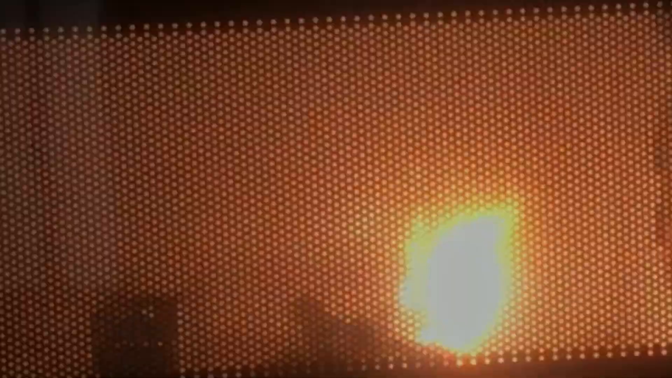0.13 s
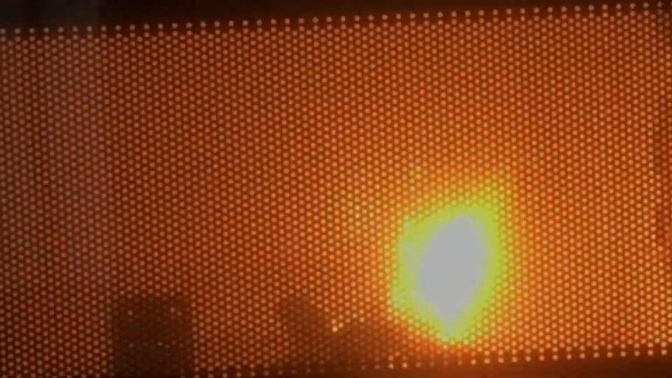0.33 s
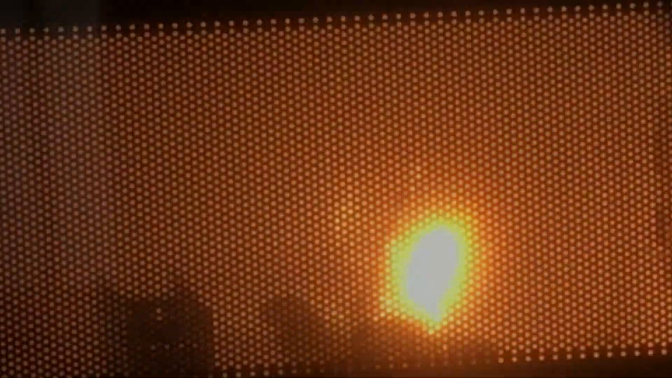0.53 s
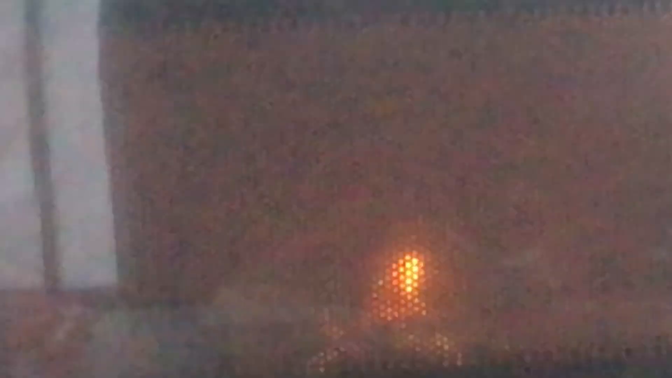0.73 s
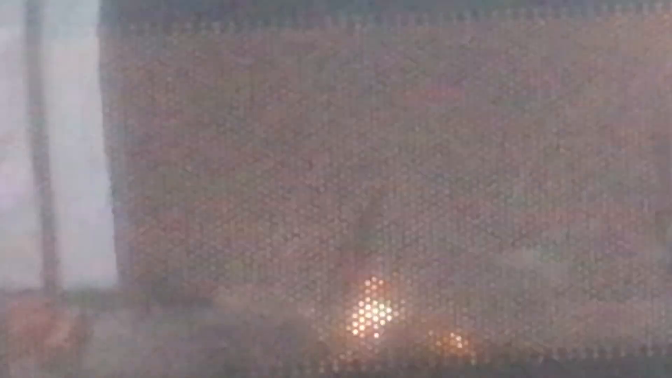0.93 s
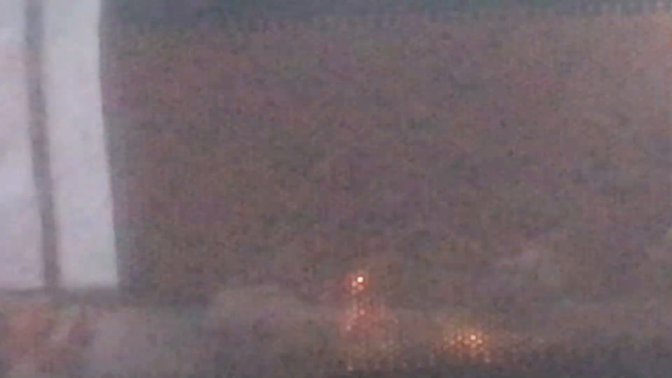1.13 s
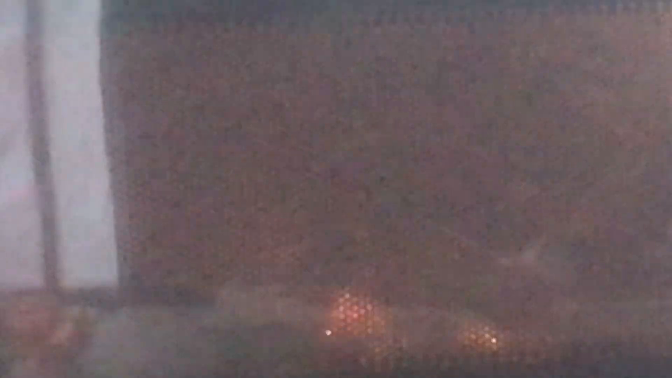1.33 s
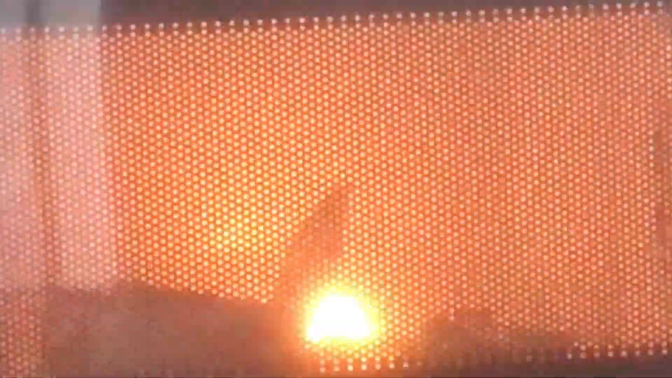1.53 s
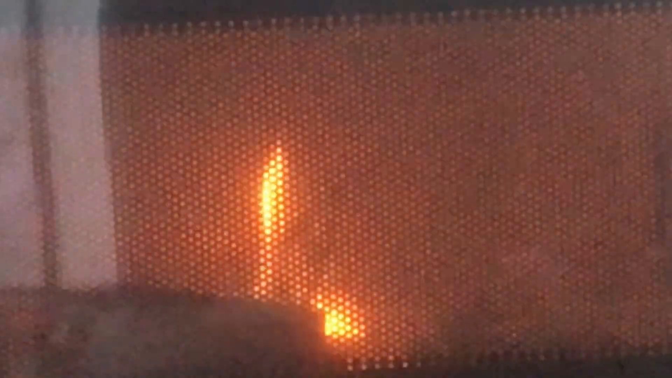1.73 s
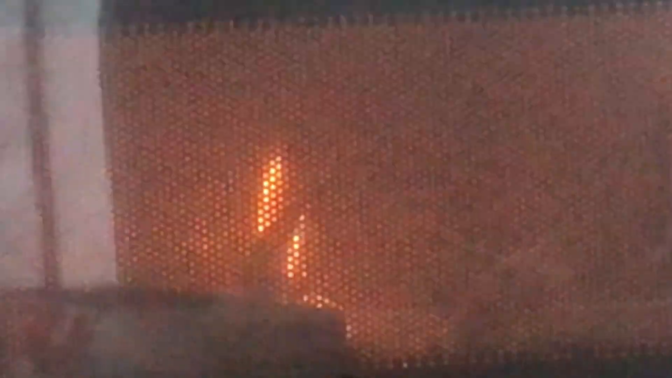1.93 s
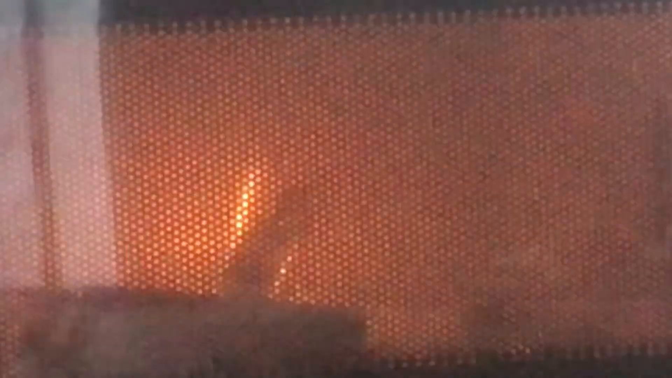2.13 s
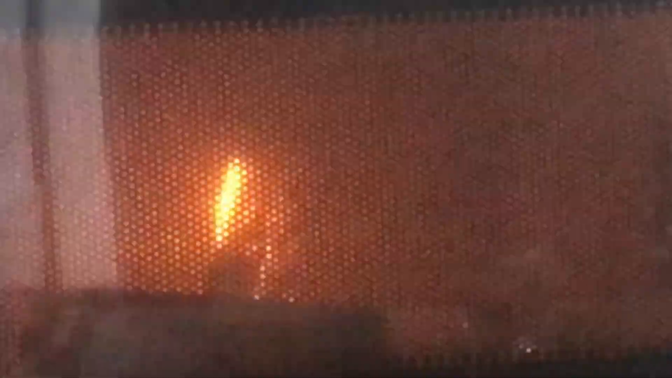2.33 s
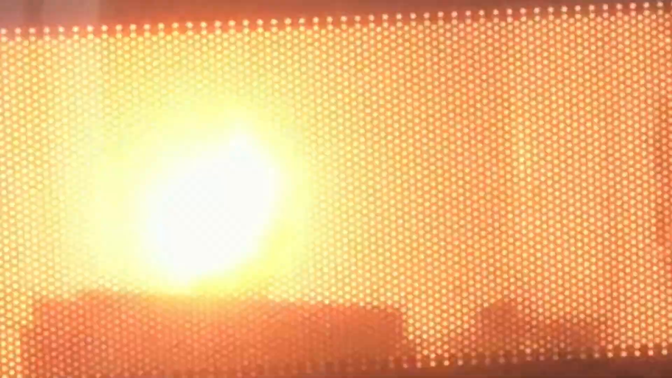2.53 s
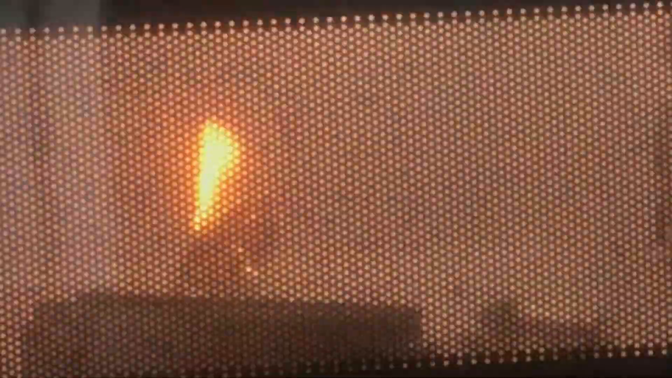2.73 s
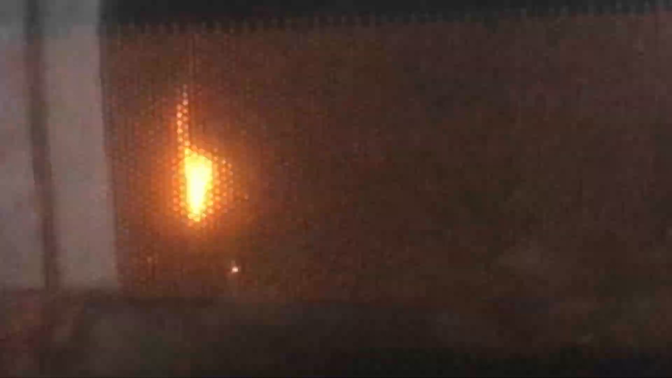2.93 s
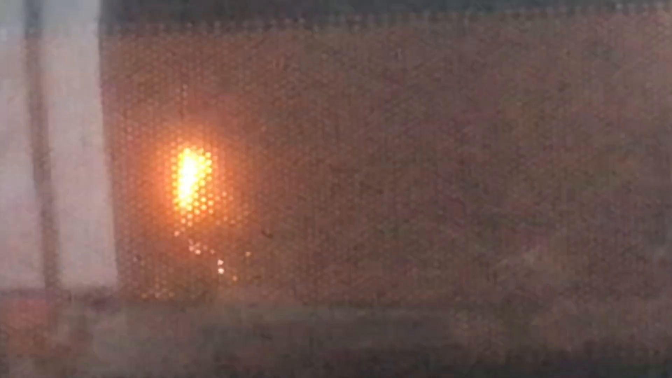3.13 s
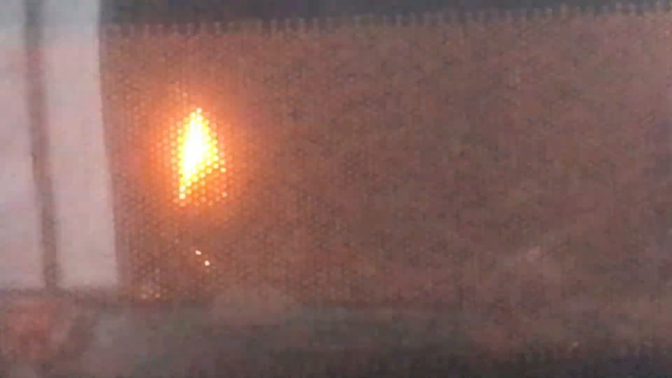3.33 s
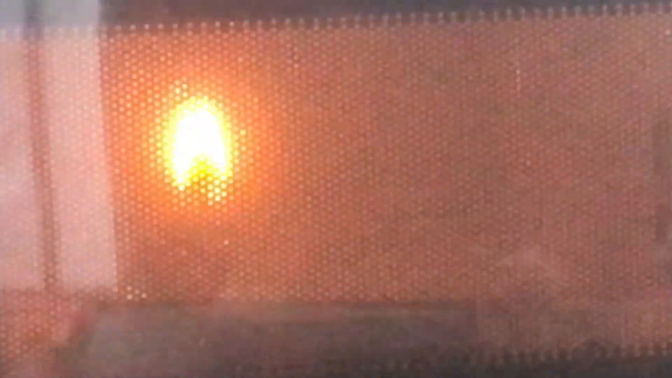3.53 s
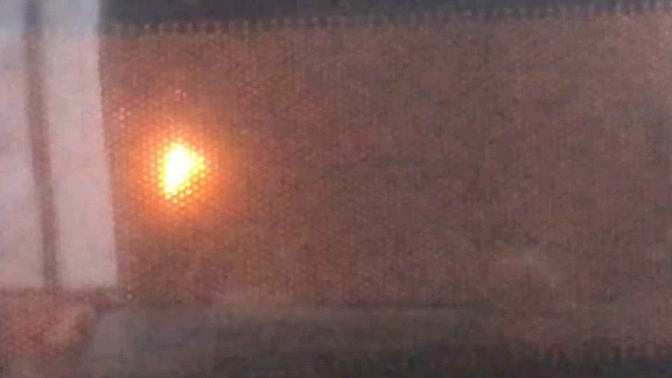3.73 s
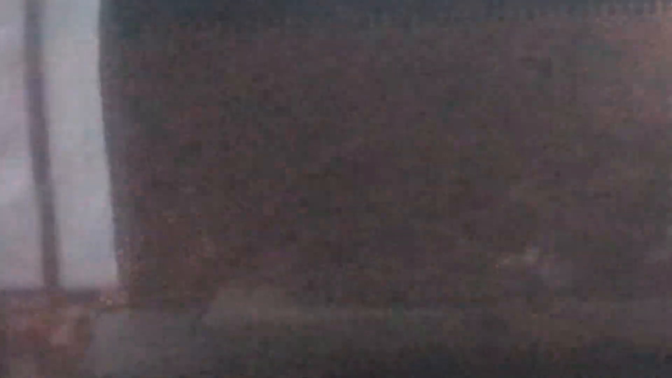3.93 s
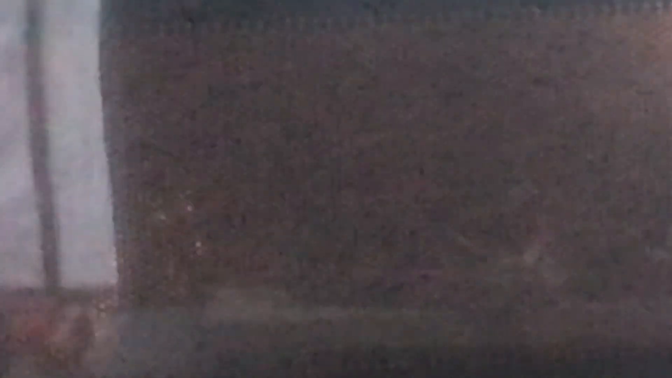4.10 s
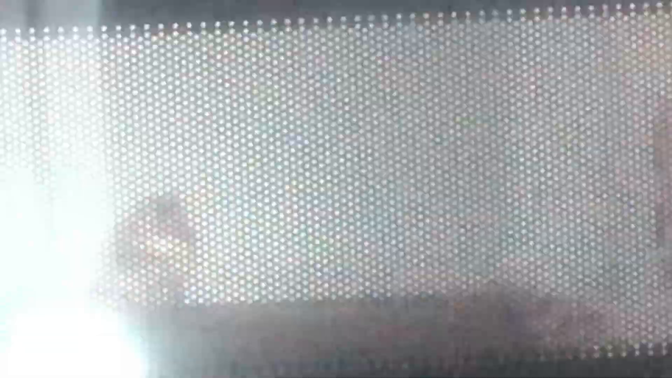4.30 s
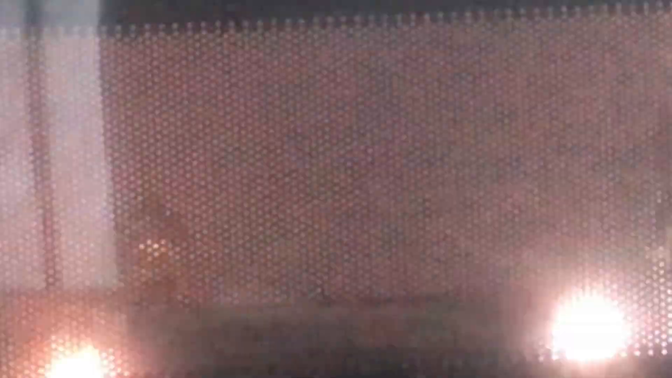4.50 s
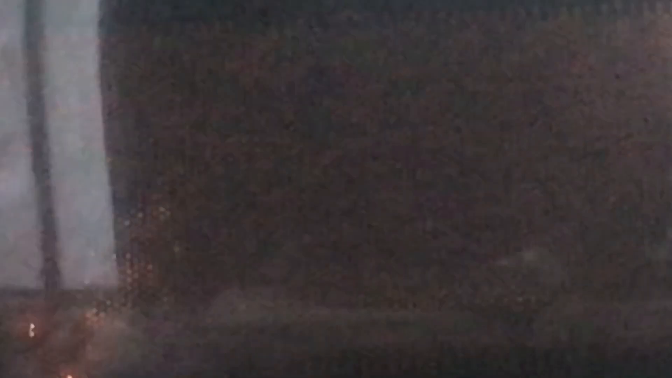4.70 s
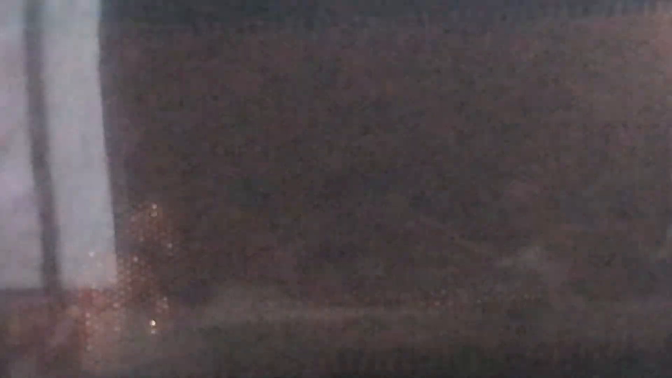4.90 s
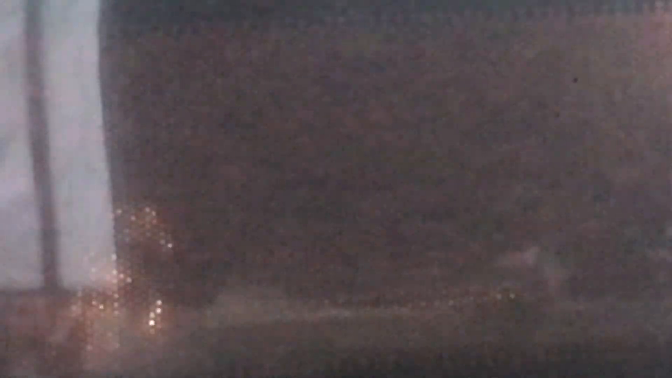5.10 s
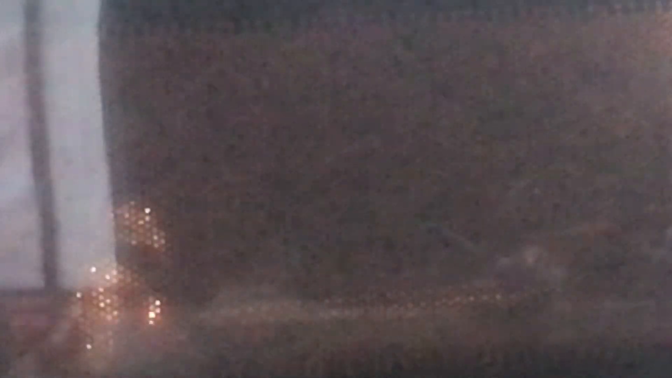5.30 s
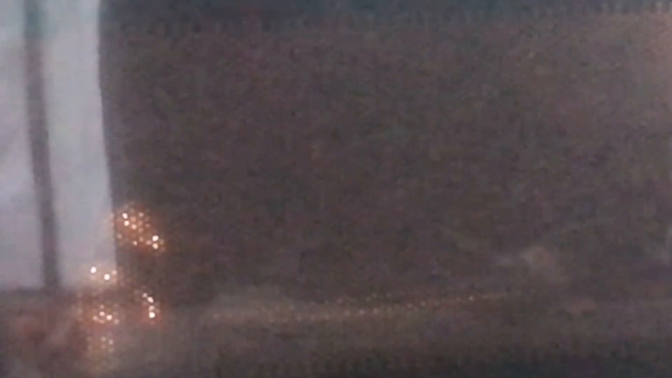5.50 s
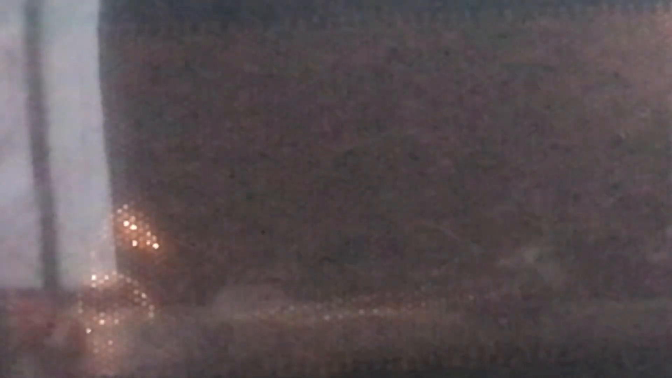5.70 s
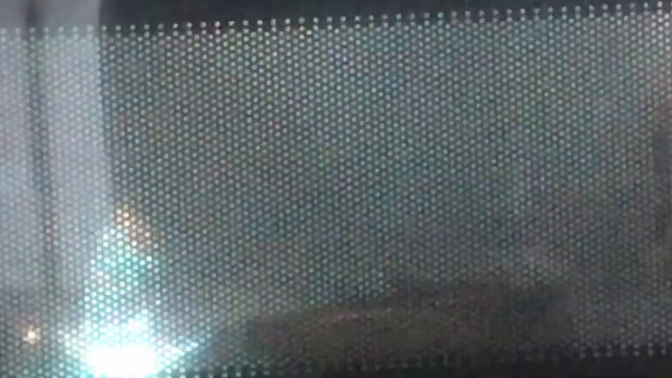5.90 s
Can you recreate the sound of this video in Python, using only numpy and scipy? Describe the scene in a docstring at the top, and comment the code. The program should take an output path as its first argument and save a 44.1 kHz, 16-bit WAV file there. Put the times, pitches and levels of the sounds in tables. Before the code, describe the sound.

A running microwave oven hums while electric arcs inside it sizzle, buzz and crack in uneven bursts.

```python
"""Sizzle and a low, raspy buzz over a humming microwave oven: metal and light bulbs are arcing inside.
The magnetron fires once in every mains cycle, so held arcs spit and plasma flames buzz on that beat.
Flash-overs snap across the top, each with a thump through the door. Snaps, sizzle and rasp ring in
the steel cooking chamber; the transformer's hum and the cooling fan are the bed under it all."""
import sys
import numpy as np
from scipy import signal
from scipy.fft import rfft, irfft, next_fast_len
from scipy.io import wavfile
from scipy.ndimage import uniform_filter1d

SR = 44100
rng = np.random.default_rng(int(sys.argv[2]) if len(sys.argv) > 2 else 0)


def transcribe(signal):
    """Save signal, clipped to [-1, 1], as a 16-bit WAV file at the path in sys.argv[1]."""
    frames = np.atleast_2d(signal).T
    limited = np.clip(frames, -1, 1)
    pcm = np.round(limited * 32767).astype(np.int16)
    wavfile.write(sys.argv[1], SR, pcm)


N = 266849
TIME = np.arange(N) / SR
MAINS_HZ, FIRST_FIRING_S = 49.9, 0.009

# held arcs, levels relative: start/s, end/s, first level/dB, last level/dB, top-treble trim/dB
ARC_CUES = [(-.02, 0.245, -42.5, -52, -4), (0.271, 0.355, -44.5, -52.5, -5),
            (0.391, 0.651, -51.5, -48.5, -3), (0.929, 0.973, -53.5, -54.5, -3), (1.03, 1.07, -58, -55, -3),
            (1.215, 1.359, -55.5, -50, -4), (1.443, 1.731, -53, -63, -3), (1.757, 2.01, -60.5, -57, -4),
            (2.014, 2.104, -54.5, -54.5, -1), (2.113, 2.326, -73.5, -54, -8),
            (2.306, 2.368, -52, -49.5, 2.5), (2.37, 2.459, -41.5, -49.5, 1),
            (2.48, 2.785, -63.5, -71.5, -9), (3.436, 3.495, -52.5, -47.5, 0), (4.18, 4.49, -49, -52, 3),
            (4.502, 4.658, -38.5, -45.5, -2.5), (4.94, 5.5, -69.5, -79, -0.5),
            (5.867, 5.969, -40.5, -48, 1)]
# bright tone of a spark, for sizzle and snaps alike: f/Hz, relative level/dB
SPARK_EQ = [(200, -19.5), (450, -6), (900, -12), (1400, -4.5), (1680, -8), (2300, -6.5), (3400, -3),
            (4500, 0.5), (6400, 1.5), (7400, -3.5), (9500, 2.5), (10300, -3.5), (12500, -0.5), (15800, -3)]
# plasma flames, levels relative: start/s, end/s, buzz/dB, overtones against the buzz/dB, rasp/dB
FLAME_CUES = [(-.02, .37, -41.5, -5, -51), (0.393, 0.624, -49, 1.5, -48.5), (0.657, 0.92, -66, 2, -60.5),
              (1.445, 1.61, -50, -3.5, -74), (1.88, 2.05, -62, 0, -60.5), (2.305, 2.463, -54.5, 1.5, -61),
              (2.478, 2.565, -41.5, -9, -56), (2.562, 2.777, -48, 2.5, -60.5), (4.45, 4.49, -43, -14, -69),
              (4.562, 4.698, -45.5, -10, -80), (5.87, 6.05, -58, 1.5, -72)]
# midrange tone of a flame's rasp: f/Hz, relative level/dB
RASP_EQ = [(150, 9), (300, -9), (560, 4.5), (850, -5.5), (1150, -3.5), (1400, -4.5), (1700, -12.5),
           (2500, -12.5), (4000, -19.5), (9000, -55)]
# bass-heavy tone of one swell of plasma: f/Hz, relative level/dB
BUZZ_EQ = [(25, -34.5), (50, 4.5), (100, 4), (150, 3), (200, -0.5), (250, -10.5), (320, -41.5),
           (400, -17.5), (460, -20), (580, -21.5), (700, -18), (830, -29.5), (1400, -36), (2500, -55)]
# transformer hum: multiple of the mains frequency, level/dB
HUM_HARMONICS = [(1, -65.5), (2, -64), (3, -66.5), (4, -70.5), (6, -75.5), (8, -92), (11, -82.5),
                 (14, -80.5)]
# rush of the fan's air: f/Hz, relative level/dB
AIR_EQ = [(20, -16), (53, 1.5), (110, -8.5), (150, -9.5), (222, -16), (300, -18), (560, -19.5),
          (720, -25.5), (1050, -22.5), (1600, -26.5), (2500, -32.5), (5000, -40), (10300, -47),
          (12800, -43), (16000, -47.5)]
# wavering tones of the fan and its duct: f/Hz, width/Hz, level/dB
DUCT_TONES = [(58.5, 12, -58.5), (151.9, 5.1, -61), (624.8, 16, -70.5), (961, 9.3, -78.5), (2120, 52, -84),
              (2350, 33, -79)]
# standing waves of the chamber: f/Hz, width/Hz, peak against the diffuse echoes/dB
CHAMBER_MODES = [(396, 38, 0), (569, 59, 4), (1319, 18, 9), (1365, 20, 14), (1485, 20.5, 9.5),
                 (1770, 13, 3), (1873, 8.1, 13), (1984, 11, 13), (2132, 11, 7), (2522, 12, 12),
                 (2813, 9.8, 7), (3572, 35, 9), (4170, 21, -9), (4470, 48, -0.5), (4660, 37, -7.5),
                 (5300, 37, 2.5), (6367, 43, 6), (7950, 63, -4)]
# flash-overs, levels relative: t/s, level/dB, body trim/dB, fizz trim/dB
SNAP_CUES = [(0.1518, -45, 7.5, -1.5), (0.2558, -42.5, -16, -11), (.9338, -63, -2, -3),
             (1.0093, -51.5, -9, -3), (1.1365, -54, 0, -3.5), (1.191, -56, -11, -2.5),
             (1.3745, -32.5, -8.5, -12), (1.4126, -34, -9, -11), (1.8947, -42, -12, -3),
             (2.0555, -46.5, 0.5, -4.5), (2.3159, -47, 4.5, -2), (2.4963, -42.5, -1.5, 0),
             (2.8583, -40, 4, -5), (2.8767, -38, -3, -11), (2.8968, -48, 5.5, -4), (4.097, -54, -4, -1.5),
             (4.3033, -38.5, 5, -9), (4.3195, -35, 1.5, -19), (4.3389, -41, 2.5, -23),
             (4.4153, -40, -2.5, -15), (4.4571, -35, -3, -9.5), (4.4966, -36, -7, -7),
             (4.596, -37, -4, -2.5), (4.661, -42.5, -0.5, -6.5), (4.7972, -50.5, 0, -3),
             (5.861, -51.5, -1, -3), (5.9015, -40.5, -4.5, -10)]
# low modes of the door and casing: f/Hz, relative level/dB, t60/s
CASING_MODES = [(121.8, -7.5, 0.23), (140, -4.5, 0.092), (180, -17, 0.082)]


def gain_of(db):
    """Decibels to amplitude."""
    return 10 ** (np.asarray(db) / 20)


def unit_rms(x):
    """Scales to rms 1."""
    return x / np.sqrt(np.mean(x ** 2) + 1e-20)


def curve_at(points, hz):
    """Reads a curve whose points are joined on a log-frequency axis."""
    f, value = np.transpose(points)
    return np.interp(np.log(hz + 1), np.log(f + 1), value)


def add(mix, s, sound):
    """Mixes a sound in at time s."""
    part = mix[max(round(s * SR), 0):][:len(sound)]
    part += sound[:len(part)]


def ring(x, response):
    """Passes x through an impulse response."""
    return signal.fftconvolve(x, response)[:len(x)]


def equalise(x, points, size=8192):
    """Colours x with an EQ curve of energy 1; minimum phase keeps the attacks sharp."""
    log_gain = np.log(gain_of(curve_at(points, abs(np.fft.fftfreq(size, 1 / SR)))))
    response = np.fft.ifft(np.exp(np.conj(signal.hilbert(log_gain)))).real[:size // 2]
    return ring(x, response / np.linalg.norm(response))


def noise(shape):
    """Noise of rms 1 whose amplitude spectrum follows shape(Hz)."""
    size = next_fast_len(N)
    spectrum = rfft(rng.standard_normal(size)) * shape(np.fft.rfftfreq(size, 1 / SR))
    return unit_rms(irfft(spectrum, size)[:N])


def magnetron_gate(duty, uneven_db):
    """The magnetron's power: on for part of each mains cycle, each time a little different."""
    cycles = (TIME - FIRST_FIRING_S) * MAINS_HZ + 1
    size = gain_of(uneven_db * rng.standard_normal(int(cycles[-1]) + 1))
    arch = np.sin(np.pi * np.minimum(cycles % 1 / duty, 1)).clip(0)
    return unit_rms(np.sqrt(arch) * size[cycles.astype(int)])


def magnetron_clicks(lag_s, uneven_db, jitter_s):
    """One click on each firing of the magnetron, loose in level and timing."""
    times = np.arange(FIRST_FIRING_S + lag_s, TIME[-1] - 0.002, 1 / MAINS_HZ)
    size, shift = rng.standard_normal((2, len(times)))
    samples = ((times + jitter_s * shift) * SR).astype(int)
    clicks = np.zeros(N)
    clicks[np.clip(samples, 0, N - 1)] = gain_of(uneven_db * size)
    return unit_rms(clicks)


def burn_envelope(start, end, rise_s, die_s):
    """A discharge catches, holds until its end, then dies away."""
    return np.clip((TIME - start) / rise_s, 0, 1) * np.exp(-np.maximum(TIME - end, 0) / die_s)


def arc_sizzle(sparks_per_s=6000, spread_db=3.5, trim_db=-3, top_hz=9500):
    """A held arc spits tiny sparks of many sizes whenever the magnetron is on."""
    size = gain_of(spread_db * np.minimum(rng.exponential(1, N), 4)) * rng.choice([-1, 1], N)
    sparks = unit_rms(size * (rng.random(N) < sparks_per_s / SR))
    sparks *= magnetron_gate(duty=0.52, uneven_db=0.8)
    top = signal.filtfilt(*signal.butter(2, top_hz, "high", fs=SR), sparks)
    body_fader, top_fader = np.zeros((2, N))
    for start, end, first_db, last_db, top_db in ARC_CUES:
        ramp = gain_of(np.interp(TIME, [start, end], [first_db, last_db]))
        arc = ramp * burn_envelope(start, end, rise_s=0.0043, die_s=0.0055)
        body_fader = np.maximum(body_fader, arc)
        top_fader = np.maximum(top_fader, arc * gain_of(top_db))
    return gain_of(trim_db) * equalise((sparks - top) * body_fader + top * top_fader, SPARK_EQ)


def flame_faders(sag_db_per_s=3):
    """Faders for buzz, overtones and rasp: each flame flares up and sinks slowly while it burns."""
    faders = np.zeros((3, N))
    for start, end, buzz_db, overtone_db, rasp_db in FLAME_CUES:
        sag_db = sag_db_per_s * (np.clip(TIME, start, end) - (start + end) / 2)
        flare = burn_envelope(start, end, rise_s=0.018, die_s=0.015) * gain_of(-sag_db)
        faders = np.maximum(faders, gain_of([[buzz_db], [buzz_db + overtone_db], [rasp_db]]) * flare)
    return faders


def flame_buzz(buzz_fader, overtone_fader, crossover_hz=175):
    """The plasma swells and collapses once a cycle: a low buzz, soft or hard from flame to flame."""
    swells = -magnetron_clicks(lag_s=0.008, uneven_db=2.1, jitter_s=0.00003)
    lows = signal.sosfiltfilt(signal.butter(4, crossover_hz, fs=SR, output="sos"), swells)
    return equalise(lows * buzz_fader + (swells - lows) * overtone_fader, BUZZ_EQ)


def flame_rasp(fader, strike_db=-2, puff_db=-8):
    """The plasma strikes anew on every firing and tears at the air in a short puff."""
    strikes = gain_of(strike_db) * magnetron_clicks(lag_s=0.002825, uneven_db=3.5, jitter_s=0.00007)
    puffs = gain_of(puff_db) * rng.standard_normal(N) * magnetron_gate(duty=0.395, uneven_db=2)
    return equalise((strikes + puffs) * fader, RASP_EQ)


def transformer_hum(waver=0.095, waver_hz=6):
    """The transformer drones on harmonics of the mains, its level wavering slightly."""
    hum = sum(gain_of(db) * unit_rms(np.sin(2 * np.pi * (multiple * MAINS_HZ * TIME + rng.random())))
              for multiple, db in HUM_HARMONICS)
    return hum * (1 + waver * noise(lambda f: 1 / (1 + (f / waver_hz) ** 2)))


def cooling_fan(air_db=-56):
    """Rushing air, with narrow bands of noise for the tones of the fan and its duct."""
    air = gain_of(air_db) * noise(lambda f: gain_of(curve_at(AIR_EQ, f)))
    tones = sum(gain_of(db) * noise(lambda f: 1 / (1 + ((f - hz) / width) ** 2))
                for hz, width, db in DUCT_TONES)
    return air + tones


def steel_chamber(t60_low_s=0.22, t60_high_s=0.12, direct=0.12, build_s=0.0014):
    """The chamber's reverb: dense echoes between steel walls, with standing waves poking out."""
    t = np.arange(SR // 3) / SR
    hz, when, echoes = signal.stft(rng.choice([-1., 1.], len(t)), SR, nperseg=256)
    t60 = curve_at([(1000, t60_low_s), (10000, t60_high_s)], hz)[:, None]
    tail = signal.istft(echoes * gain_of(-60 * when / t60), SR, nperseg=256)[1][:len(t)]
    tail *= 1 - np.exp(-t / build_s)
    tail /= np.linalg.norm(tail)
    tail[0] += direct
    # the diffuse echoes ring in many fine lines but share their energy evenly over wider bands
    band_db = 10 * np.log10(uniform_filter1d(abs(rfft(tail)) ** 2, size=70))
    tail = equalise(tail, np.column_stack([np.fft.rfftfreq(len(t), 1 / SR), -band_db]))
    tail /= np.linalg.norm(tail)
    for mode_hz, width, db in CHAMBER_MODES:
        damping = np.pi * width
        tail += gain_of(db) * 2 * damping / SR * np.exp(-damping * t) * np.cos(2 * np.pi * mode_hz * t)
    return tail / np.linalg.norm(tail)


def flashover_snaps(trim_db=5, burn_s=0.0053, crack=1.04, lift_db=3):
    """Each flash-over is a crack followed by a few milliseconds of spitting discharge."""
    snaps, t = np.zeros(N), np.arange(2048) / SR
    hz = np.fft.rfftfreq(len(t), 1 / SR)
    for s, db, body_db, fizz_db in SNAP_CUES:
        burst = rng.standard_normal(len(t)) * np.exp(-(t / burn_s) ** 2)
        burst[0] += crack
        colour = [(1800, body_db + lift_db), (4000, 0), (6300, 0), (10000, fizz_db + lift_db)]
        makeup = np.sqrt(np.mean(gain_of(curve_at(colour, hz)) ** 2))  # more body or fizz plays louder
        add(snaps, s, gain_of(db + trim_db) * makeup * equalise(burst, colour))
    return equalise(snaps, SPARK_EQ)


def casing_thumps(trim_db=5, rise_s=0.0032, thump_per_body=0.52):
    """Air heated by a flash-over pushes on door and casing; a snap with more body heats more air."""
    thumps, t = np.zeros(N), np.arange(SR // 4) / SR
    for s, snap_db, body_db, _ in SNAP_CUES:
        detunes = 1 + 0.046 * rng.standard_normal(len(CASING_MODES))
        modes = sum(gain_of(db - 60 * t / t60) * np.sin(2 * np.pi * hz * detune * t)
                    for (hz, db, t60), detune in zip(CASING_MODES, detunes))
        push = gain_of(snap_db + thump_per_body * body_db + trim_db)
        add(thumps, s, push * modes * (1 - np.exp(-t / rise_s)) / abs(modes).max())
    return thumps


def scene():
    """The arcs ring in the chamber; their low push comes straight through the door."""
    buzz_fader, overtone_fader, rasp_fader = flame_faders()
    arcs = ring(flashover_snaps() + arc_sizzle() + flame_rasp(rasp_fader), steel_chamber())
    low_end = casing_thumps() + flame_buzz(buzz_fader, overtone_fader)
    bed = transformer_hum() + cooling_fan()
    return (arcs + low_end + bed)[None]


def record(dry, low_cut_hz=36, high_cut_hz=15850):
    """A small microphone loses the deepest bass; a steep high cut takes off the very top."""
    thin = signal.sosfilt(signal.butter(4, low_cut_hz, "high", fs=SR, output="sos"), dry)
    high_cut = signal.firwin(511, high_cut_hz, window=("kaiser", 9), fs=SR)
    return signal.oaconvolve(thin, high_cut[None], "same")


dry = scene()
out = record(dry)
transcribe(out)
```